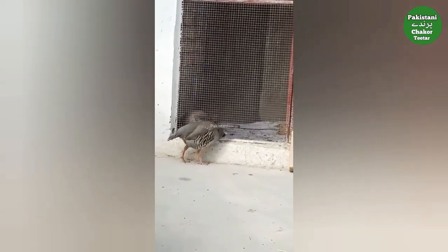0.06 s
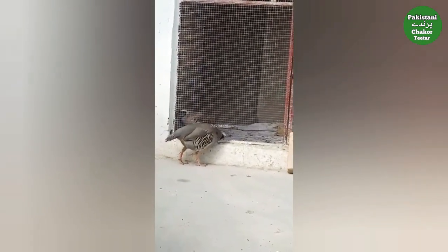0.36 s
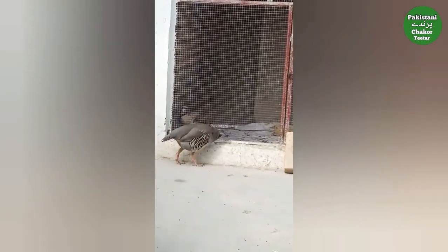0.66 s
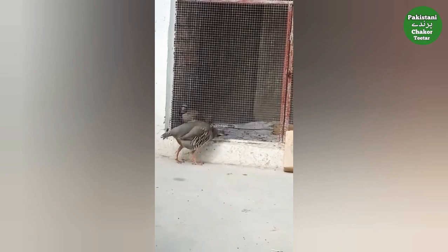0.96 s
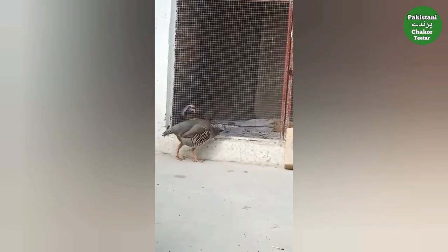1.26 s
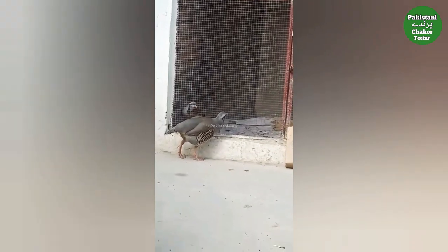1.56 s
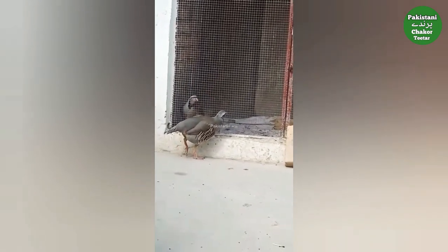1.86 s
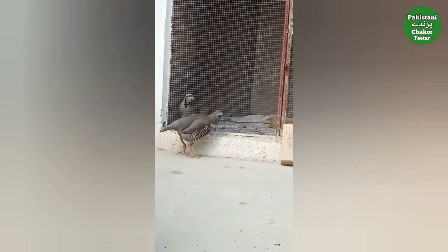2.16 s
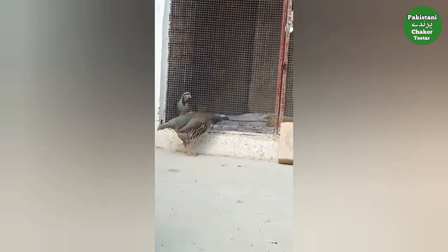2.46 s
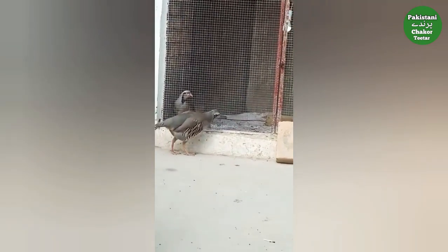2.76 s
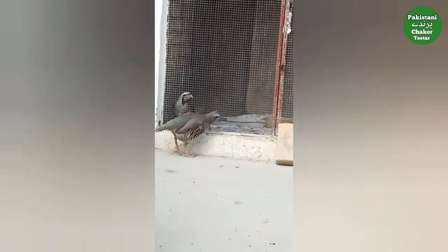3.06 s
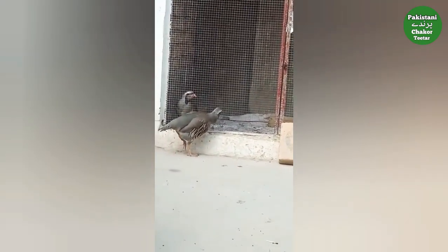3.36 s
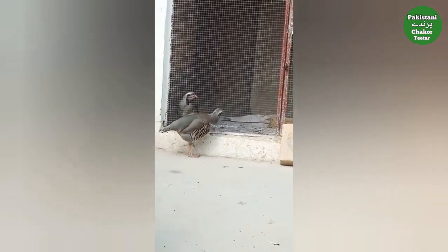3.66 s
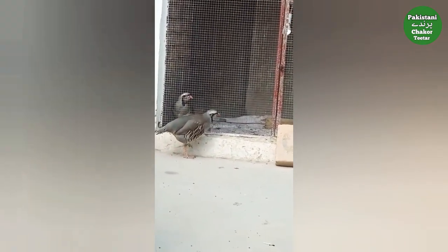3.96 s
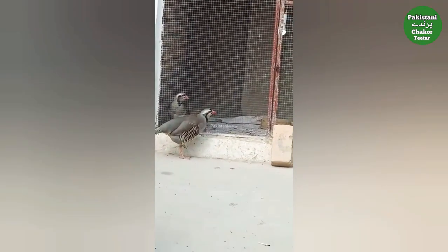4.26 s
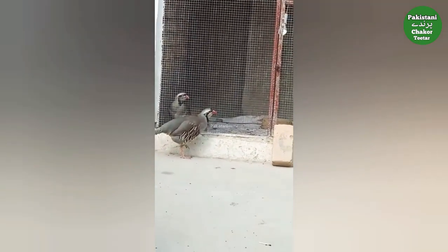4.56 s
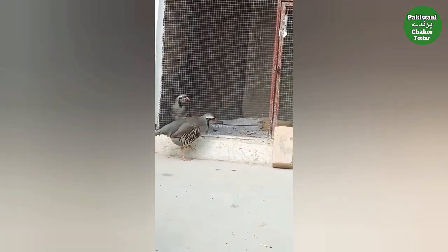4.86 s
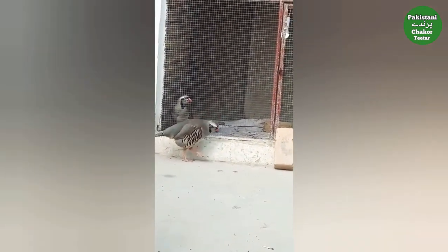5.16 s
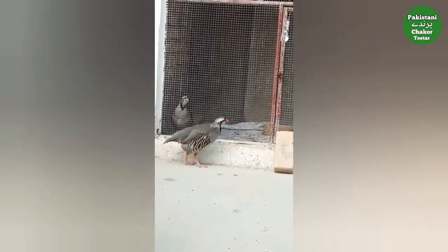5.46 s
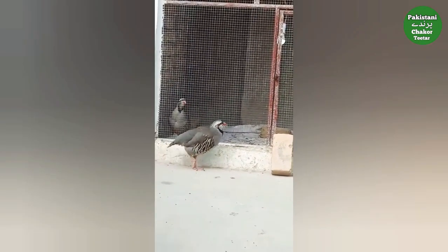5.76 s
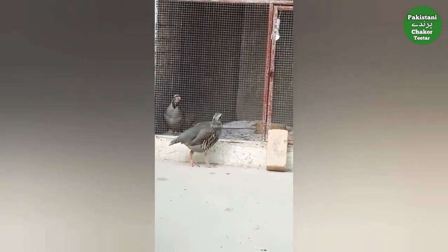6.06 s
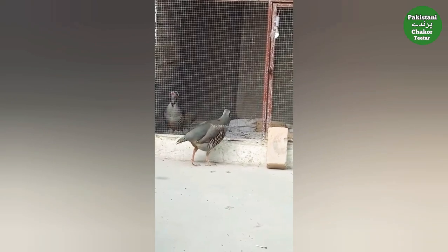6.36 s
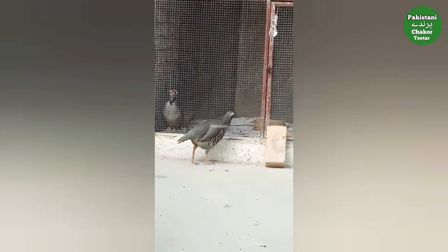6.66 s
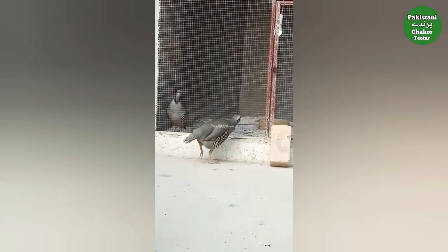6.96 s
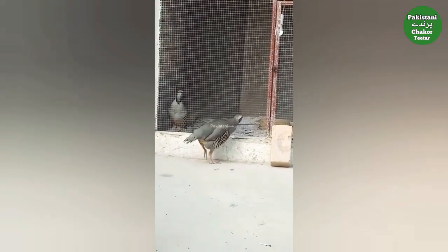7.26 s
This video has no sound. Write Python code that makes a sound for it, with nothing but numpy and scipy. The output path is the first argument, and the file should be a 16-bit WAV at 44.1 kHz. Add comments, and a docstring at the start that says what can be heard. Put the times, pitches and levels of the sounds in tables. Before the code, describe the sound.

Two partridges cluck at each other in a concrete and wire mesh aviary, a couple of metres away, each note ringing briefly off the walls. For the first second there are a few short hoarse barks and grunts, with light claw scuffs on grit. From about 1.4 seconds, soft sliding murmurs come in quick succession, alternating with rasps. From about 3.3 seconds a run of clear, short clucks sets in, roughly five a second, growing steadily louder and higher until 6.5 seconds. Two tiny squeaks slip in around 4 seconds, and harsh little barks then fall between the clucks. A brief high squeal comes at 6.6 seconds, and the loudest moment is a raspy squawk with a sharp squeal at about 7.2 seconds, followed by a last bark and peep. Faint foot scuffs, quiet outdoor air and a low hum continue throughout.

```python
"""Two chukar partridges in an aviary

The birds cluck at each other behind wire mesh, a couple of metres away. Each call is a source and a
filter: the syrinx buzzes or slaps unevenly, and the throat and beak resonate. Short arched notes
alternate with hoarse rasps, growing louder and higher until they break into squeals. Feet scuff the
floor, the concrete walls ring briefly, and a low hum lies under everything."""
import sys
import numpy as np
from scipy import signal
from scipy.fft import rfft, irfft, next_fast_len
from scipy.io import wavfile

SR = 44100
rng = np.random.default_rng(int(sys.argv[2]) if len(sys.argv) > 2 else 0)


def to_wav(sig):
    """Store sig (one row per channel, or 1-D mono) as 16-bit WAV at the path in sys.argv[1].

    Samples outside -1..1 are clipped; the rate is SR.
    """
    pcm = np.clip(np.atleast_2d(sig), -1, 1) * 32767
    pcm = np.round(pcm).astype(np.int16)
    wavfile.write(sys.argv[1], SR, pcm.T)  # frames by channels


N = 331191
TOP_HZ = 15600


def undb(db):
    """Amplitude ratio of a level in decibels."""
    return 10 ** (np.asarray(db) / 20)


def unit(x):
    """Normalisation to an rms of 1."""
    return x / np.sqrt(np.mean(x ** 2) + 1e-18)


def colour(x, points):
    """Spectral shaping by a curve of (Hz, dB) points that rolls off beyond both ends."""
    size = next_fast_len(x.shape[-1] + 1024, True)
    hz = np.arange(size // 2 + 1) * SR / size
    knots_hz, db = np.transpose(points)
    skirts = np.minimum(1, hz / knots_hz[0]) * np.minimum(1, knots_hz[-1] / (hz + 1))
    gain = undb(np.interp(np.log(hz + 1), np.log(knots_hz), db)) * skirts ** 2
    return irfft(rfft(x, size) * gain, size)[..., :x.shape[-1]]


def wander(n, rate):
    """Random modulation: straight lines join Gaussian values drawn `rate` times a second."""
    knots = rng.standard_normal(n // 20 + 2)
    return np.interp(np.arange(n) * rate / SR, np.arange(len(knots)), knots)


def swell(release_at, rise, fall):
    """Times and amplitude envelope of one push: rounded rise, hold, exponential decay."""
    t = np.arange(int(.14 * SR)) / SR
    onset = np.sin(np.pi / 2 * np.minimum(t / rise, 1)) ** 2
    return t, onset * np.exp(-np.maximum(t - release_at, 0) / fall)


def add(track, start, sound):
    """Superposition of a sound on a track, from `start` seconds."""
    i = max(int(start * SR), 0)
    track[i:i + len(sound)] += sound[:max(N - i, 0)]


# Spectrum of the still outdoor air. Each row: frequency in Hz, relative density in dB.
AIR_SPECTRUM = [(25, -25), (50, -16), (80, -10), (110, 2), (200, -9), (400, -7.5), (900, -14),
                (1400, -19.5), (2200, -21), (4000, -35), (6500, -36.5), (9500, -50), (15500, -53)]
def yard_air():
    """Diffuse noise: a faint rumble whose coherence between the ears is greatest in the bass."""
    mid, side = colour(rng.standard_normal((2, N)), AIR_SPECTRUM)
    spread = colour(side, [(60, -18.5), (250, -12.5), (700, -5), (15000, 4.0)])
    stereo = (mid + spread * np.array([[1], [-1]])) / np.std(mid)
    return undb(-60.5 + 1.4 * wander(N, 25)) * stereo


# Partials of the low hum. Each row: frequency in Hz, level in dB.
HUM_PARTIALS = [(101, -65.5), (120, -69)]
def hum():
    """Random amplitude and frequency modulation make two low tones waver."""
    tones = np.zeros(N)
    for hz, db in HUM_PARTIALS:
        amplitude = 1 + .5 * wander(N, 14)
        phase = 2 * np.pi * np.cumsum(hz + 4 * wander(N, 13)) / SR
        tones += undb(db) * unit(amplitude * np.sin(phase))
    return tones


# The cage rings less in the bass, which escapes by the mesh. Each row: frequency in Hz, gain in dB.
CAGE_RESPONSE = [(100, -4), (400, -3), (800, 0), (2000, 0), (5000, -1), (16000, -1)]
def aviary(x, wet_db, left_db, lag_s, near_t60=.11, far_t60=.41, far_db=-9, build_s=.012):
    """Double-slope reverberation: quick echoes off floor and cage, a weaker ring from the far walls."""
    t = np.arange(24000) / SR
    hz = np.arange(len(t) // 2 + 1) * SR / len(t)
    mid, side = rfft(rng.standard_normal((2, len(t))))
    coherence = np.exp(-(hz / 600) ** 2)  # long waves reach both ears alike
    echoes = mid * np.sqrt(1 + coherence) + side * np.sqrt(1 - coherence) * np.array([[1], [-1]])
    tail = irfft(echoes) * (undb(-60 * t / near_t60) + undb(far_db - 60 * t / far_t60))
    tail *= 1 - np.exp(-t / build_s)  # reflections take a moment to arrive
    tail /= np.sqrt((tail ** 2).sum(1, keepdims=True))
    ring = signal.oaconvolve(colour(x, CAGE_RESPONSE)[None], tail, axes=1)[:, :N]
    direct = np.array([x, np.roll(x, int(lag_s * SR))])
    balance = undb(np.array([[left_db], [-left_db]]) / 2)
    return balance * (direct + undb(wet_db) * ring) / np.hypot(1, undb(wet_db))


# Spectrum of claws on grit. Each row: frequency in Hz, gain in dB.
CLAW_SPECTRUM = [(200, -20), (900, 9), (2200, 7), (4000, 0.5), (7000, 8), (9000, -6.5), (15000, -11)]
# Clearer scuffs on concrete and mesh. Each row: start and length in seconds, relative level in dB.
FOOT_SCUFFS = [(.066, 0.012, -64.5), (.134, 0.007, -63), (.36, 0.0063, -58.5), (.459, 0.0085, -58.5),
               (.673, 0.0037, -52.5), (.703, 0.032, -72), (.817, 0.01, -60.5), (.875, 0.0046, -63),
               (.96, 0.011, -64.5), (1.004, 0.0088, -53.5), (2.014, 0.0038, -57.5), (2.212, 0.032, -70),
               (2.275, 0.025, -67), (2.529, 0.011, -68.5), (2.81, 0.058, -71.5), (4.286, 0.012, -61),
               (4.345, 0.02, -69.5), (4.416, 0.0096, -64.5), (4.578, 0.071, -69.5), (5.03, 0.032, -68.5),
               (6.436, 0.0077, -56), (6.793, 0.0014, -47), (7.375, 0.0046, -61)]
def feet(shuffle_count=45):
    """Friction noise: claws drag over grit in grainy bursts, with fainter shuffles at random times."""
    track = np.zeros(N)
    shuffles = [(when * N / SR, .0075 + .0013 * span, -74 + 6 * force)
                for when, span, force in rng.random((shuffle_count, 3))]
    for start, length, db in list(FOOT_SCUFFS) + shuffles:
        t, drag = swell(length, rise=.013, fall=.009)
        grains = rng.standard_normal(len(t)) * undb(4 * wander(len(t), 653))
        add(track, start, undb(db) * drag * unit(colour(grains, CLAW_SPECTRUM)))
    return track


def flutter(pitch, jitter=.07, air_db=-7):
    """Aperiodic vibration: the syrinx membranes slap unevenly, with air rushing between the slaps."""
    n = len(pitch)
    cycles = np.cumsum(pitch * (1 + jitter * wander(n, 300))) / SR + .5
    slaps = np.diff(np.floor(cycles), prepend=0) * undb(2 * rng.standard_normal(n))
    return unit(slaps) + undb(air_db) * rng.standard_normal(n)


# Lower throat, upper throat and open-beak resonances. Each row: frequency in Hz, gain in dB.
LOWER_FORMANT = [(120,-42), (220,-14.5), (340,-15.5), (550,-7.5), (800,-11.5), (1100,-8.5), (2000,-78.5)]
UPPER_FORMANT = [(500, -50), (850, -6), (1100, 2), (1350, -2), (1700, -14.5), (3000, -24)]
BEAK_FORMANT = [(1100, -3), (1700, 17.5), (2400, 13.5), (3000, 10), (3800, -2.5), (4800, -9.5), (7000, -34),
                (9000, -46), (15000, -43.5)]
RESTING_THROAT_HZ = 1100
def hoarse_note(length, db, upper_db, beak_db, throat_hz=RESTING_THROAT_HZ):
    """Impulse excitation: slaps ring two throat formants that shift together, and the opening beak."""
    t, push = swell(length * 1.23, rise=.009 + length * .08, fall=.0094)
    slap_hz = 325 * (1 + .076 * rng.standard_normal())
    slaps = flutter(slap_hz * (1 - .2 * (1 - push)))  # the rate sags at low pressure
    stretch = np.array([throat_hz / RESTING_THROAT_HZ, 1])
    lower = unit(colour(slaps, stretch * LOWER_FORMANT))
    upper = undb(upper_db) * unit(colour(slaps, stretch * UPPER_FORMANT))
    opening = np.exp(-((t / length - .55) / .54) ** 2)
    beak = undb(beak_db) * opening * unit(colour(slaps, BEAK_FORMANT))
    return undb(db) * push * (unit(lower + upper) + beak)


# Deep grunts. Each row: start and nominal length in seconds, relative level in dB, resonance in Hz.
GRUNT_NOTES = [(0.736, 0.033, -51.5, 830), (0.86, 0.025, -52, 650), (3.387, 0.018, -50.5, 560),
               (5.855, 0.036, -48, 593), (6.186, 0.077, -56, 760)]
def grunts():
    """Low resonance: a grunt sounds deep in the throat, almost wholly through the lower formant."""
    track = np.zeros(N)
    for start, length, db, throat_hz in GRUNT_NOTES:
        add(track, start, hoarse_note(length, db, upper_db=-53, beak_db=-20, throat_hz=throat_hz))
    return track


# Short barks. Each row: start and nominal length in seconds, relative level in dB, resonance in Hz.
BARK_NOTES = [(0.092, 0.02, -47.5, 960), (0.306, 0.018, -43, 1140), (0.56, 0.011, -49.5, 880),
              (0.648, 0.017, -47.5, 930), (1.219, 0.019, -45, 984), (4.04, 0.038, -46, 1070),
              (4.35, 0.018, -46.5, 1000), (4.645, 0.02, -49.5, 1250), (4.747, 0.039, -45, 1260),
              (4.864, 0.043, -47.5, 1200), (5.139, 0.053, -44.5, 1054), (5.616, 0.048, -42.5, 976),
              (6.335, 0.047, -42.5, 1090), (6.637, 0.072, -42.5, 1060), (6.855, 0.063, -42, 1120),
              (6.944, 0.031, -44, 1050), (7.303, 0.061, -43.5, 1050)]
def barks(equal_formants_db=-46):
    """Brightness grows with effort: behind a shut beak, harder barks favour the upper formant."""
    track = np.zeros(N)
    for start, length, db, throat_hz in BARK_NOTES:
        upper_db = 2 * (db - equal_formants_db)
        add(track, start, hoarse_note(length, db, upper_db, beak_db=-27, throat_hz=throat_hz))
    return track


# Harsh rasps. Each row: start and nominal length in seconds, relative level in dB.
RASP_NOTES = [(1.026, 0.017, -48.5), (1.867, 0.029, -54.5), (2.075, 0.048, -50), (2.344, 0.023, -51.5),
              (2.63, 0.066, -52.5), (2.854, 0.013, -46), (3.064, 0.049, -56), (3.126, 0.022, -57),
              (3.282, 0.065, -51), (3.512, 0.076, -50.5), (3.656, 0.035, -52), (5.751, 0.053, -52),
              (6.045, 0.092, -42), (6.623, 0.053, -47.5), (7.131, 0.031, -41.5), (7.19, 0.082, -49.5)]
def rasps(equal_formants_db=-43.4, opening_s=.019):
    """Radiation from an aperture: the beak lets out treble, but opens only partly in the briefest rasps."""
    track = np.zeros(N)
    for start, length, db in RASP_NOTES:
        upper_db = 2.5 * (db - equal_formants_db)
        beak_db = -3 + 20 * np.log10(min(length / opening_s, 1))
        add(track, start, hoarse_note(length, db, upper_db, beak_db))
    return track


# Resonances of the wide-open beak. Each row: frequency in Hz, gain in dB.
WIDE_BEAK_RESPONSE = [(1500, -8), (2150, -1), (2440, -1.5), (2780, -3), (3120, -1), (3500, -10),
                      (4200, -11), (4800, -13.5), (5600, -24), (9000, -30.5)]
# One list for each squeal. Each row: time in seconds, pitch in Hz, relative level in dB.
SQUEAL_SLIDES = [
    [(3.846, 2500, -58), (3.857, 2620, -47), (3.868, 2600, -57)],
    [(4.015, 2500, -58), (4.035, 2430, -47), (4.06, 2400, -57)],
    [(6.606, 2330, -48), (6.62, 2400, -38), (6.634, 2430, -33), (6.648, 2560, -39), (6.664, 2400, -37),
     (6.678, 2300, -50)],
    [(7.16, 2250, -44), (7.171, 2400, -31), (7.189, 2480, -25), (7.195, 3050, -35), (7.213, 3150, -32),
     (7.221, 2900, -37), (7.228, 2460, -32), (7.25, 2400, -44)],
]
def squeals(waver=.045, tremble=.4, overtone_db=-15, air_db=-13):
    """Register break: the voice jumps to a sliding whistle, roughened by fast modulation and breath."""
    track = np.zeros(N)
    for slide in SQUEAL_SLIDES:
        times, hz, db = np.transpose(slide)
        t = np.arange(times[0], times[-1], 1 / SR)
        pitch = np.interp(t, times, hz) * (1 + waver * wander(len(t), 836))
        phase = 2 * np.pi * np.cumsum(pitch) / SR
        tone = np.sin(phase) + undb(overtone_db) * np.sin(2 * phase)
        tone *= 1 + tremble * wander(len(t), 500)
        whistle = unit(colour(tone, WIDE_BEAK_RESPONSE))
        air = undb(air_db) * unit(colour(rng.standard_normal(len(t)), WIDE_BEAK_RESPONSE))
        envelope = undb(np.interp(t, times, db)) * signal.windows.tukey(len(t), .1)
        add(track, times[0], envelope * (whistle + air))
    return track


def pitch_contour(t, length, push, glide, arch, scoop, drop):
    """Frequency modulation, as a ratio: a note scoops up, glides along an arch and drops at its end."""
    along = np.minimum(t / length, 1) - .5
    ratio = 1 + glide * along - arch * (2 * along) ** 2
    ratio *= 1 - scoop * np.exp(-t / .014)
    ratio *= 1 - .08 * (1 - push) ** 2  # the pitch sags at low pressure
    ratio *= 1 - drop * np.exp(np.minimum(t - length, 0) / .012)
    return ratio * (1 + .013 * wander(len(t), 70))


def resonate(x, hz, width_hz):
    """A second-order resonator passes a band around its natural frequency."""
    return signal.lfilter(*signal.iirpeak(hz, hz / width_hz, fs=SR), x)


# Spectra of the breath, the throat and the open beak. Each row: frequency in Hz, gain in dB.
BREATH_SPECTRUM = [(100, 12), (1200, 9), (2500, 18), (6000, 18), (16000, 17)]
THROAT_RESPONSE = [(200,-24), (400,3), (600,11.5), (800,13.5), (1200,8), (1500,-11.5), (2400,-8),
                   (3300,-21), (4700,-18), (5600,-14), (7000,-21), (9000,-33.5), (15000,-27.5)]
BEAK_RESPONSE = [(1100,11), (1500,15.5), (1800,7), (2400,-0.5), (2800,-20), (3500,-14.5), (4300,-38.5),
                 (10000,-66)]
JITTER, SHIMMER = .016, .24  # unsteadiness of pitch and of amplitude, as shares, before fraying
NASAL_HZ, NASAL_WIDTH_HZ = 4660, 900
def voiced_note(length, hz, db, throat_hz, *, glide, arch, beak_db, scoop=0, drop=.08, attack=.393,
                air_db=-20, width_hz=230, skirt_db=-13, chest_db=-18, nasal_db=-45):
    """Source and filter: the syrinx buzzes, and a throat resonance picks out one or two harmonics."""
    t, push = swell(length * .79, rise=length * attack, fall=.01)
    pitch = hz * pitch_contour(t, length, push, glide, arch, scoop, drop)
    fray = .4 + 1.3 * np.minimum(t / length, 1)  # a note starts clean and roughens
    cycles = np.cumsum(pitch * (1 + JITTER * fray * wander(len(t), 260))) / SR
    # the windpipe smears each pulse, so the harmonics do not peak together
    harmonics = np.exp(2j * np.pi * rng.random(80))[:int(TOP_HZ / hz)]
    period = irfft(np.r_[0, harmonics], 4096)
    buzz = unit(period[(cycles % 1 * len(period)).astype(int)])
    buzz *= 1 + SHIMMER * fray * wander(len(t), 235)
    # air leaks through once a cycle, mostly in the treble
    air = unit(rng.standard_normal(len(t)) * (1 + np.cos(2 * np.pi * cycles)))
    source = buzz + undb(air_db) * colour(air, BREATH_SPECTRUM)
    formant = resonate(source, throat_hz, width_hz)
    throat = unit(colour(formant + undb(skirt_db) * source, THROAT_RESPONSE))
    beak = undb(beak_db) * unit(colour(source, BEAK_RESPONSE))
    # the fundamental also radiates straight from the puffed-out neck
    chest = undb(chest_db) * unit(np.real(harmonics[0] * np.exp(2j * np.pi * cycles)))
    # a high resonance of the windpipe gives the nasal edge
    windpipe = resonate(buzz, NASAL_HZ, NASAL_WIDTH_HZ)
    nasal = undb(nasal_db) * unit(resonate(windpipe, NASAL_HZ, NASAL_WIDTH_HZ))
    return undb(db) * push * (throat + beak + chest + nasal)


# One low, flat squawk. Each row: start and length in seconds, pitch in Hz, relative level in dB.
SQUAWK_NOTES = [(7.133, 0.056, 229, -40)]
def squawk():
    """Sharp resonance: a low, breathy buzz drives a narrow formant and leaves by the open beak."""
    track = np.zeros(N)
    for start, length, hz, db in SQUAWK_NOTES:
        add(track, start, voiced_note(length, hz, db, throat_hz=1070, glide=0, arch=0, beak_db=6,
                                      air_db=-9.5, width_hz=110, chest_db=-30))
    return track


# Thin peeps. Each row: start and length in seconds, pitch in Hz, relative level in dB.
PEEP_NOTES = [(1.352,0.0407,592.6,-54.5), (7.409,0.0463,526,-51.5)]
def peeps():
    """Two radiating paths: a rising note sends overtones from the beak, its fundamental from the neck."""
    track = np.zeros(N)
    for start, length, hz, db in PEEP_NOTES:
        add(track, start, voiced_note(length, hz, db, throat_hz=1010, glide=.09, arch=.076,
                                      beak_db=6, chest_db=-3.5))
    return track


# Soft murmurs of both birds. Each row: start and length in seconds, pitch in Hz, glide as a share of
# the pitch, relative level in dB, number of the resonant harmonic.
MURMUR_NOTES = [(0.746,0.028,303,0.14,-46,2), (0.863,0.043,447,-0.25,-48.5,1),
                (1.395,0.037,457,-0.26,-47,2), (1.454,0.036,308.4,-0.22,-42.5,2),
                (1.485,0.032,429,-0.17,-53,2), (1.513,0.034,358.6,-0.075,-45.5,2),
                (1.526,0.064,478.3,-0.016,-45.5,2), (1.597,0.055,476.3,0.19,-50.5,2),
                (1.612,0.059,579,0.292,-52.5,1), (1.654,0.0454,429.6,-0.1,-52,2),
                (1.68,0.06,561,-0.21,-52.5,1), (1.736,0.038,462.5,-0.24,-48.5,2),
                (1.782,0.048,504,0.2,-49.5,2), (1.801,0.035,299.7,-0.26,-44,2),
                (1.827,0.045,384,-.2,-46.5,2), (1.875,0.056,310.8,-0.036,-44.5,2),
                (2.028,0.046,299.5,0.044,-51,2), (2.176,0.065,455.6,0.124,-42,2),
                (2.259,0.049,469.6,0.22,-42.5,2), (2.313,0.035,453,-0.11,-48,2),
                (2.342,0.022,347,-0.08,-47,2), (2.445,0.044,525,-0.041,-42,1),
                (2.517,0.041,423,-0.016,-44.5,2), (2.547,0.032,347,-0.17,-42.5,2),
                (2.578,0.055,421.8,-0.18,-45,2), (2.642,0.05,430.3,-0.063,-42,2),
                (2.794,0.044,363,-0.16,-49.5,3), (2.904,0.053,343,-0.1,-41.5,2),
                (2.955,0.041,338,-0.068,-47,2), (3.004,0.043,358.5,0.16,-41,2),
                (3.043,0.06,474.7,0,-42.5,2), (3.112,0.035,577,0.12,-43,1), (3.347,0.029,359,-0.18,-38.5,2),
                (3.825,0.051,435,-0.17,-43,2), (4.333,0.049,456.4,0.25,-47,2),
                (4.666,0.065,346.2,0.23,-42,2), (4.867,0.047,429.7,-0.28,-45.5,2),
                (5.214,0.032,511.7,0.13,-43,2), (5.486,0.049,393,0.12,-39,2),
                (5.583,0.035,506,-0.068,-39,2), (5.72,0.057,400.5,0.3,-48.5,2),
                (6.496,0.088,393.3,0.019,-43.5,2), (6.871,0.04,475.3,-0.057,-37.5,2),
                (7.227,0.048,438,0.088,-44,2), (7.288,0.027,500,0.23,-44,2)]
def murmurs():
    """Formant tuning: the throat resonance settles on one harmonic of each sliding note."""
    track = np.zeros(N)
    for start, length, hz, glide, db, harmonic in MURMUR_NOTES:
        add(track, start, voiced_note(length, hz, db, hz * round(harmonic), glide=glide, arch=.06,
                                      beak_db=-18, width_hz=300, skirt_db=-5.5, chest_db=-14))
    return track


# The main run of clear clucks. Each row: start and length in seconds, pitch in Hz, relative level in dB.
CHUCK_NOTES = [(3.255, 0.053, 334, -44.5), (3.546, 0.075, 339, -45.5), (3.753, 0.058, 366.2, -40.5),
               (3.958, 0.071, 367.5, -40), (4.224, 0.05, 338.8, -41.5), (4.405, 0.062, 385.4, -39),
               (4.581, 0.0802, 375.4, -38.5), (4.69, 0.048, 382.4, -42), (4.793, 0.069, 367.3, -41.5),
               (4.885, 0.053, 377.2, -40), (5.057, 0.071, 397, -39), (5.324, 0.072, 402.8, -38),
               (5.496, 0.082, 405.5, -38.5), (5.804, 0.058, 410.3, -37), (5.973, 0.058, 413.4, -36),
               (6.279, 0.056, 415, -37.5), (6.537, 0.071, 426, -35)]
def chucks():
    """Formant tuning near the third harmonic, with the beak nearly shut, gives a clear "chuck"."""
    track = np.zeros(N)
    for start, length, hz, db in CHUCK_NOTES:
        nasal_db = -19 + 2.5 * (db + 35.5)  # the nasal edge grows faster than the note itself
        throat_hz = 2.933 * hz * (1 + .033 * rng.standard_normal())
        glide = .0094 + .04 * rng.standard_normal()
        note = voiced_note(length, hz, db, throat_hz, glide=glide, arch=.0616, beak_db=-15.5, scoop=.13,
                           drop=.22, attack=.386, air_db=-16, skirt_db=-9.5, nasal_db=nasal_db)
        add(track, start, note)
    return track


def scene():
    """Superposition: calls and footsteps reverberate in the aviary, over the yard's air and hum."""
    voiced = undb(.5) * (chucks() + murmurs() + peeps())
    clucking = aviary(voiced, wet_db=1.5, left_db=1.46, lag_s=-.00012)
    harsh = undb(4) * (barks() + grunts() + rasps()) + squawk() + squeals()
    scolding = aviary(harsh, wet_db=-.5, left_db=2.5, lag_s=.00018)
    steps = aviary(undb(8) * feet(), wet_db=2, left_db=10.5, lag_s=-.0001)
    return yard_air() + hum() + steps + scolding + clucking


def record(dry):
    """Band limiting: a steep elliptic low-pass filter cuts the treble above TOP_HZ."""
    return signal.sosfilt(signal.ellip(8, .2, 70, TOP_HZ, fs=SR, output="sos"), dry)


dry = scene()
out = record(dry)
to_wav(out)
```